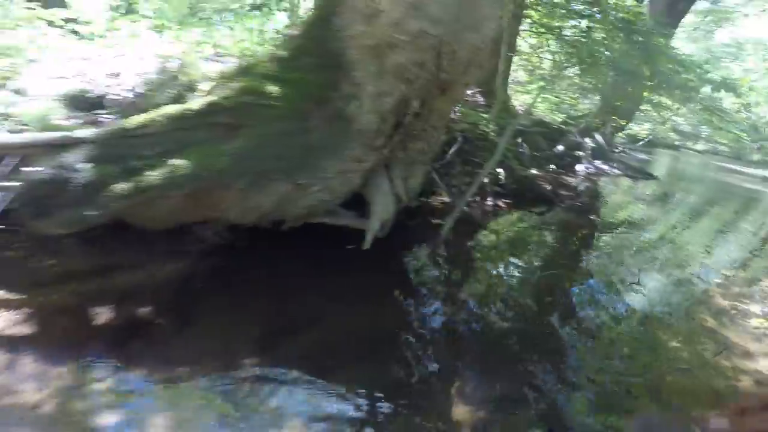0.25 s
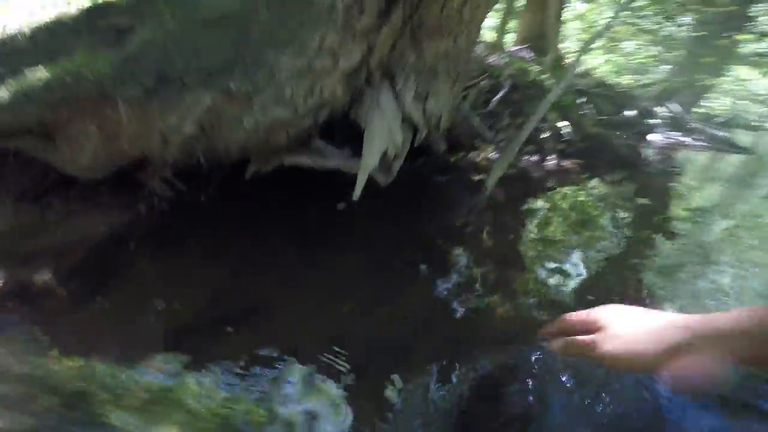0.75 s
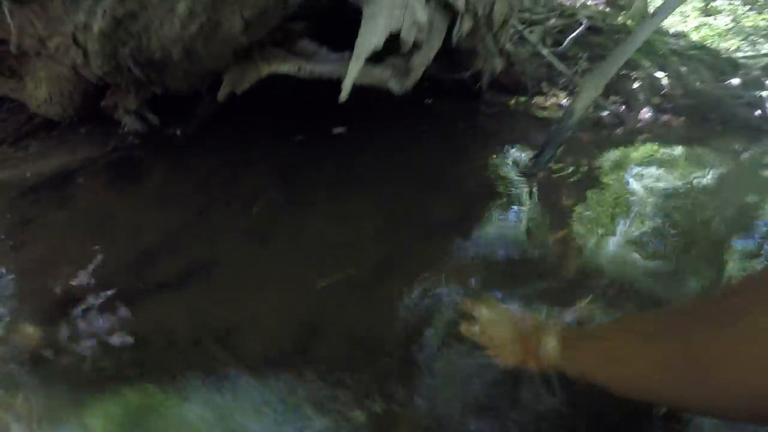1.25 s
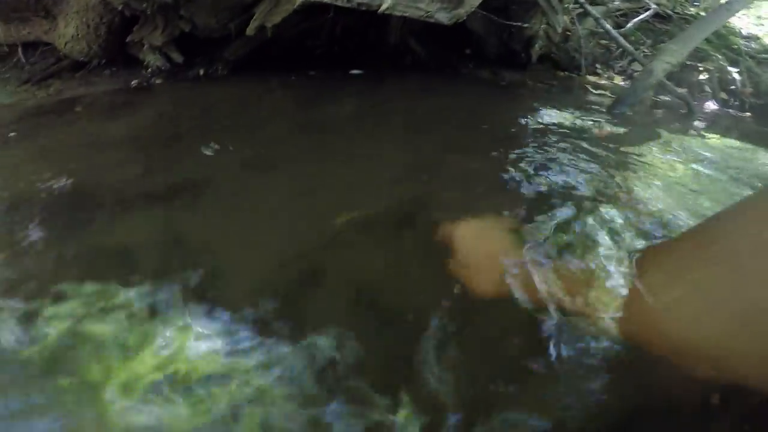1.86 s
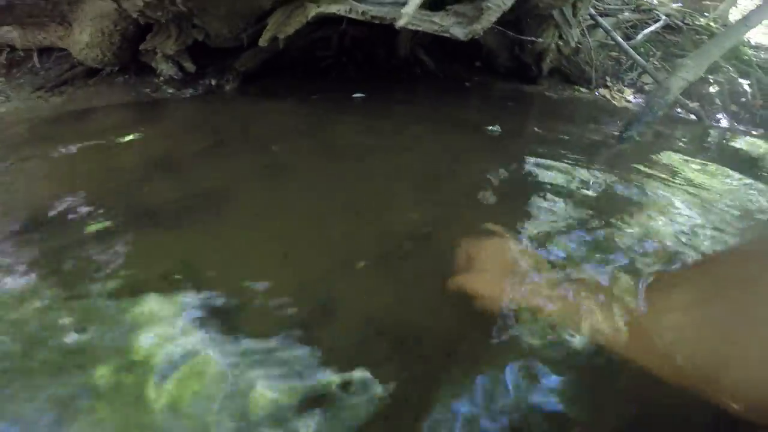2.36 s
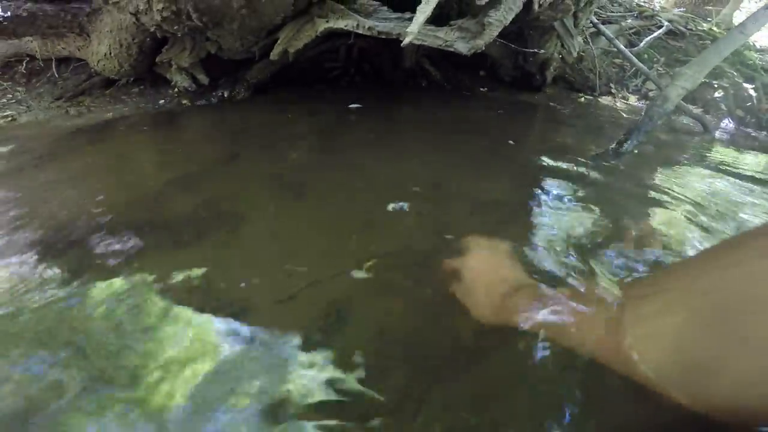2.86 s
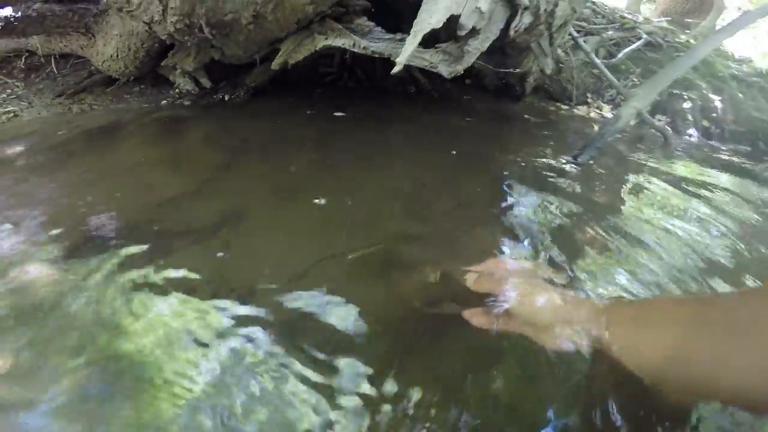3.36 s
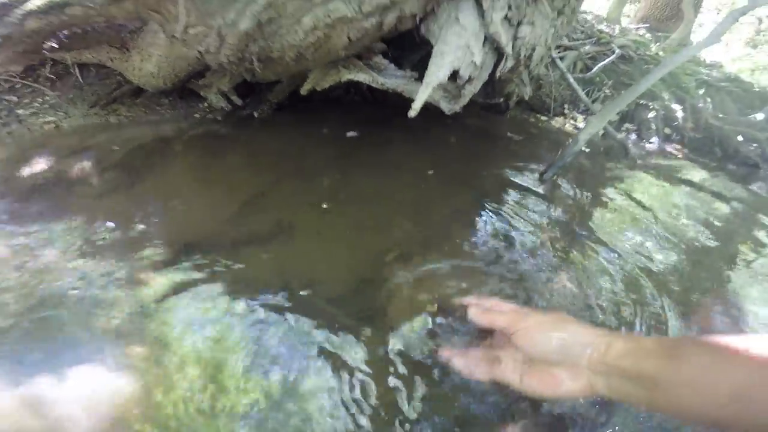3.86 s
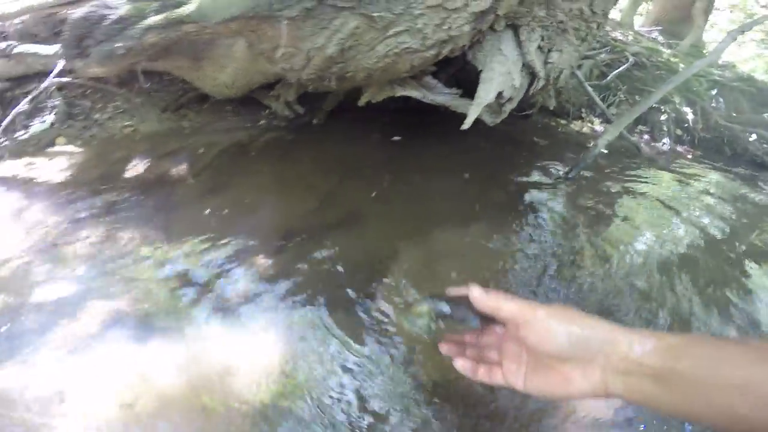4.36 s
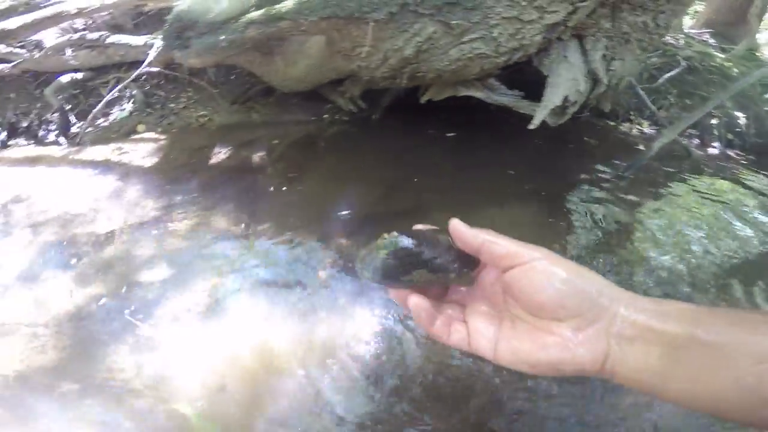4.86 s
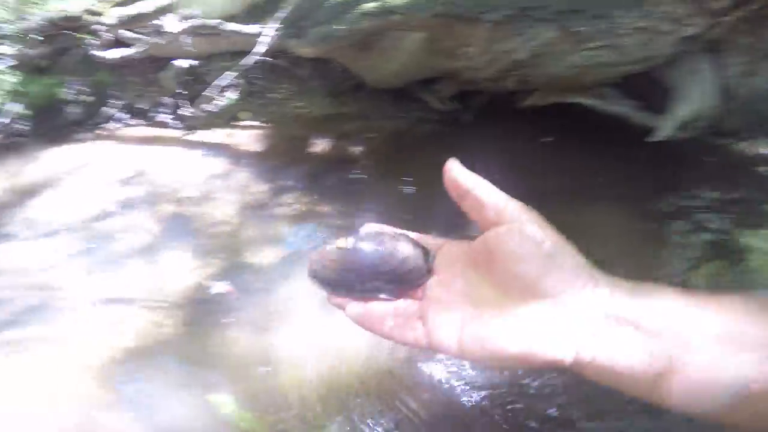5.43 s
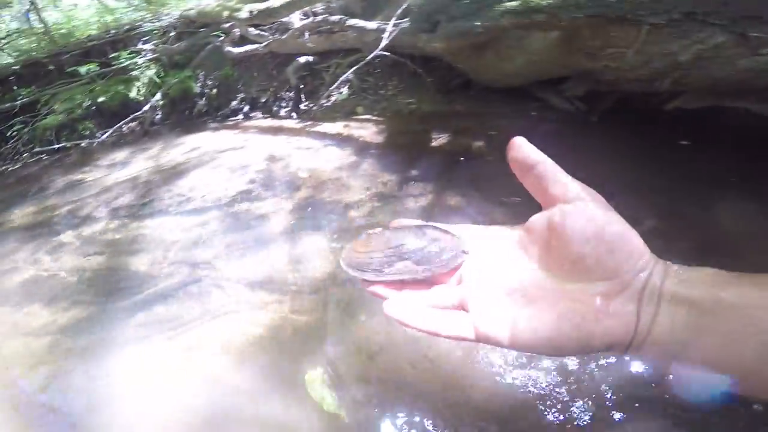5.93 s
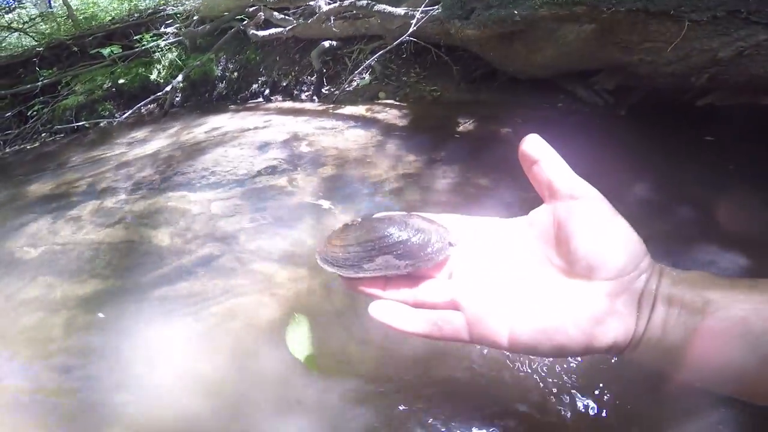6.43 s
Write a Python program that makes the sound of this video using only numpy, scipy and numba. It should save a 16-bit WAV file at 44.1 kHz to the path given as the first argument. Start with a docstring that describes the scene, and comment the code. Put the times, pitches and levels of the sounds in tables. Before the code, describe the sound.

Shallow water sloshes and gurgles with small, sharp splashes as someone wades and reaches into a forest stream. The splashing dies down within two seconds, and a distant bird faintly repeats a short phrase. Then single drops plink back into the water as the hand lifts out. The close, handheld microphone picks up a low rumble and dull knocks throughout, over a soft hiss.

```python
"""Water sloshes and glugs as someone wades and reaches into a shallow forest stream; then single
drops fall from the lifted hand. The water gets its notes from air bubbles, which ring like tiny bells.
The hand holding a small camera over the stream makes its housing rumble and knock. A far bird repeats
one phrase, and a second adds a few higher notes. Under it all lie a soft hiss and a thin whine
from the camera's electronics, tied to the frame rate."""
import sys
import numpy as np
from scipy import signal
from scipy.fft import rfft, irfft
from scipy.io import wavfile
from scipy.ndimage import uniform_filter1d
from numba import njit

SR = 44100
rng = np.random.default_rng(int(sys.argv[2]) if len(sys.argv) > 2 else 0)


def bounce(signal):
    """Save signal as a 16-bit WAV file at the path given by the first command-line argument."""
    frames = np.transpose(np.atleast_2d(signal))
    limited = np.clip(frames, -1, 1)
    pcm = np.round(limited * 32767).astype(np.int16)
    wavfile.write(sys.argv[1], SR, pcm)


N = 295029

# How loud the wading is. Each row: time in seconds, water level in dB, spray level in dB.
WADING = [(0, -59.5, -62.5), (.06, -57.5, -61.5), (.12, -58.5, -59), (.23, -55, -61.5), (.31, -60.5, -60.5),
          (.37, -51.5, -56), (.44, -57.5, -56), (.5, -57.5, -57.5), (.56, -57, -57), (.62, -51, -55),
          (.67, -61.5, -61), (.72, -59, -66), (.77, -60.5, -60.5), (.86, -59, -64.5), (1, -64, -67),
          (1.15, -68, -67), (1.3, -68.5, -69), (1.5, -71.5, -74), (1.9, -75, -71)]
WADING_END_S = WADING[-1][0]
# How hard the hand shakes the housing.
# Each row: time in seconds, rumble level in dB, upper bass in dB compared with the rumble.
GRIP_LEVELS = [(0.0, -45, -8), (0.16, -36.5, -8.5), (0.27, -44.5, -7), (0.33, -34.5, -7), (.4, -30, -14),
               (.47, -37, -10), (0.53, -44, -1.5), (.59, -35.5, -11.5), (.66, -38.5, -15),
               (0.73, -39.5, -4.5), (.81, -48.5, -3.5), (.89, -39, -10), (.99, -47.5, -6),
               (1.08, -41, -4.5), (1.15, -39.5, -12), (1.21, -32, -21), (1.29, -41, -13),
               (1.38, -48.5, -6.5), (1.48, -45.5, -6), (1.65, -47.5, -9.5), (1.78, -44, -10),
               (2, -46.5, -13), (2.24, -39.5, -20.5), (2.36, -43.5, -12), (2.44, -40.5, -15),
               (2.58, -47.5, -12), (2.65, -38.5, -18), (2.8, -53.5, -6.5), (2.96, -42.5, -13),
               (3.05, -47, -11), (3.16, -43.5, -19), (3.27, -48.5, -12), (3.33, -52, -0.5),
               (3.47, -41.5, -23), (3.6, -50.5, -21), (3.66, -44, -7.5), (3.97, -49, -12), (4.01, -56, -4),
               (4.19, -40.5, -7), (4.3, -57, 5.5), (4.5, -33.5, -15.5), (4.63, -45.5, -14),
               (5.5, -42, -8.5), (5.64, -49.5, 2.5), (5.73, -40.5, -23), (5.83, -43.5, -6.5),
               (5.91, -47, -11), (5.97, -46.5, -1.5), (6.04, -49, -8), (6.2, -48, -13.5),
               (6.45, -46.5, -7.5), (6.69, -50, -8)]
# Knocks in the housing. Each row: start in seconds, level in dB, sharp edge level in dB, pitch in Hz.
HOUSING_KNOCKS = [(0.051, -21, -49.5, 71), (.122, -20, -50, 66), (1.266, -30, -64, 72.5),
                  (1.765, -28, -52.5, 73), (2.16, -22, -54.5, 65), (2.284, -22.5, -52.5, 72),
                  (2.506, -35, -52.5, 80), (3.334, -16.5, -53, 69.9), (3.647, -32.5, -76, 72),
                  (4.013, -15.5, -50, 74.4), (4.15, -24, -55, 71.7), (4.224, -21.5, -51, 72),
                  (4.413, -21, -55.5, 70), (4.519, -23, -69.5, 72), (4.945, -22, -53, 72.6),
                  (4.981, -31, -52, 79.4), (5.05, -27.5, -49, 71.5), (5.21, -29, -49.5, 80),
                  (5.301, -27.5, -57, 72), (5.609, -30.5, -63.5, 72.6), (5.683, -28, -67, 72.5),
                  (5.794, -21, -48.5, 72), (5.904, -29.5, -52, 140), (5.826, -35, -66, 110),
                  (6.111, -28, -54, 79.6)]


def undb(db):
    """Turn a level in dB into a number to multiply by."""
    return 10 ** (np.asarray(db) / 20)


def level(x, db):
    """Scale a sound to an average (rms) level in dB."""
    return x * undb(db) / np.sqrt(np.mean(x ** 2))


def curves(table):
    """Join a table's timed rows with straight lines: one curve for each column after the time."""
    s, *columns = np.transpose(table)
    return [np.interp(np.arange(N) / SR, s, c) for c in columns]


def colour(x, points):
    """Make some pitches louder and others softer, following (Hz, dB) points."""
    hz, db = np.transpose(points)
    bin_hz = np.maximum(np.fft.rfftfreq(N, 1 / SR), 1)
    return irfft(rfft(x) * undb(np.interp(np.log(bin_hz), np.log(hz), db)), N)


def band(x, lo_hz, hi_hz):
    """Keep the part of a sound between two pitches."""
    return signal.sosfilt(signal.butter(2, [lo_hz, hi_hz], "band", fs=SR, output="sos"), x)


def wander(rate):
    """A smooth random curve, mostly within -1 to 1, that takes `rate` steps a second."""
    k = int(SR / rate)
    steps = np.repeat(rng.standard_normal(N // k + 1), k)
    return 0.83 * uniform_filter1d(uniform_filter1d(steps, k), k)[:N]


def steady_noise(points, seconds):
    """Coloured noise with its chance swells ironed out over `seconds`; average size near 1."""
    noise = colour(rng.standard_normal(N), points)
    k = int(seconds * SR)
    return noise / np.sqrt(uniform_filter1d(uniform_filter1d(noise ** 2, k), k))


@njit
def add_rings(out, start, hz, t60, size, glide, rise):
    """Tones that swell over `rise` cycles and fade 60 dB in `t60` seconds; `glide` above 0 bends up."""
    for g in range(len(start)):
        n, phase = int(t60[g] * SR), 0.
        for i in range(max(0, min(n, len(out) - start[g]))):
            phase += hz[g] * np.exp(glide * i / n) / SR
            envelope = np.exp(-6.9 * i / n) * min(phase / rise, 1.)
            out[start[g] + i] += size[g] * np.sin(2 * np.pi * phase) * envelope
    return out


def rings(s, hz, t60, size, glide, rise):
    """Place fading tones at start times `s`, in seconds."""
    start = np.clip(s * SR, 0, N - 1).astype(np.int64)
    each = np.ones(len(s))
    return add_rings(np.zeros(N), start, hz * each, np.clip(t60, .001, 1) * each, size, glide, rise)


def bubbles(count, lo_hz, hi_hz, cycles, spread_db):
    """A cloud of bubbles, of average size 1 during the wading; `spread_db` above 0 makes a few loud."""
    when, pitch, length, rank = rng.random((count, 4)).T
    hz = lo_hz * (hi_hz / lo_hz) ** pitch
    size = undb(-spread_db * np.log(rank + 1 / 400))
    cloud = rings(when * WADING_END_S, hz, cycles * (.5 + length) / hz, size, glide=0.353, rise=0.64)
    return level(cloud, 10 * np.log10(WADING_END_S * SR / N))


def slosh():
    """Churned water gurgles, crackles and fizzes, and sets the housing ringing."""
    # The tone of churned water. Each row: pitch in Hz, boost or cut in dB.
    water_colour = [(210, -34), (350, -5), (1050, -14), (1450, -3.5), (3540, -1.5), (3890, 1.5), (4750, -7),
                    (6370, 0), (7440, -3), (7910, -7.5), (14000, -13)]
    # Where the housing rings. Each row: pitch in Hz, width in Hz, strength in dB.
    resonances = [(1152, 250, -1), (1570, 93, -5), (1880, 100, -2.5), (3300, 170, 0), (3930, 130, 3),
                  (4400, 180, 7.5), (5200, 150, 6), (6850, 460, -6)]
    gurgle = bubbles(count=1500, lo_hz=585, hi_hz=6340, cycles=39.7, spread_db=2.5)
    crackle = bubbles(count=6000, lo_hz=1000, hi_hz=8500, cycles=9, spread_db=2.8)
    # each octave of the fizz flickers on its own
    fizz = sum(band(rng.standard_normal(N), hz, 2 * hz) * undb(3 * wander(60))
               for hz in 300 * 2 ** np.arange(6))
    water = colour(undb(-6.5) * gurgle + undb(-4) * crackle + undb(-6) * fizz, water_colour)
    housing = 0
    for hz, width, db in resonances:
        ringing = signal.lfilter(*signal.iirpeak(hz, hz / width, fs=SR), water)
        housing += undb(db + 4 * wander(40.21)) * ringing  # comes and goes as the water shifts
    water = level(water + housing, 0)
    body = signal.sosfilt(signal.butter(2, 3300, fs=SR, output="sos"), water)
    spray = water - body
    body_db, spray_db = curves(WADING)
    fade = np.clip((WADING_END_S - np.arange(N) / SR) / 0.347, 0, 1)
    return fade * (undb(body_db) * body + undb(spray_db) * spray)


def trickle():
    """Water runs off after the step: many bubbles of about one size blur into a wash."""
    # How loud the run-off is. Each row: time in seconds, level in dB.
    run_off = [(0, -70), (.5, -65), (.8, -64), (1.2, -64.5), (1.4, -70.5), (1.9, -97)]
    (db,) = curves(run_off)
    running = np.arange(N) / SR < run_off[-1][0]
    return running * undb(db) * bubbles(count=1600, lo_hz=2370, hi_hz=2964, cycles=44, spread_db=-1.5)


def grip():
    """Trembling muscles and slow shifts of the hand shake the housing into a rumble."""
    # The tone of the two layers. Each pair: pitch in Hz, boost or cut in dB.
    deep_colour = [(6, -7), (14, -8.5), (24, -0.5), (40, -10), (60, -24), (200, -71), (600, -110)]
    upper_colour = [(25, -25.5), (48, 4), (75, -7), (130, -25.5), (250, -33.5), (500, -43), (1500, -101)]
    deep = steady_noise(deep_colour, seconds=0.076)
    upper = steady_noise(upper_colour, seconds=0.015)
    deep_db, upper_db = curves(GRIP_LEVELS)
    return undb(deep_db) * deep + undb(deep_db + upper_db + 3.5 * wander(16)) * upper


def finger_slips():
    """Skin creeps on the housing: a low rustle that follows the grip and flares after each knock."""
    deep_db, upper_db = curves(GRIP_LEVELS)
    s, _, edge_db, _ = np.transpose(HOUSING_KNOCKS)
    rise_s, fade_s = 0.00315, 0.0364
    hits, t = np.zeros(N), np.arange(SR // 2) / SR
    hits[(s * SR).astype(int)] = undb(edge_db - 9)
    flare = signal.fftconvolve(hits, np.exp(-t / fade_s) * np.minimum(t / rise_s, 1))[:N]
    slips = rng.standard_normal(N) * undb(1.8 * wander(30))
    rustle = level(band(band(slips, 117, 186.3), 86, 264), 0)
    return (undb(deep_db + upper_db - 31) + flare) * rustle


def hiss():
    """The stream and the microphone make a smooth, almost steady hiss."""
    # The tone of the hiss. Each row: pitch in Hz, boost or cut in dB.
    hiss_colour = [(65, -41.5), (110, -9.5), (267, -19.5), (412, -22), (507, -22), (815, -25), (885, -25),
                   (1260, -26), (1710, -25), (5340, -29), (6300, -30.5), (6840, -33), (15300, -38.5)]
    return level(colour(rng.standard_normal(N), hiss_colour), -65) * undb(0.048 * wander(9.3))


def electronics():
    """The camera's whine restarts with every frame, and reading out each frame ticks twice."""
    frame_hz, cycles_per_frame = 29.97, 210.5
    frame_position = (np.arange(N) / SR * frame_hz - .21) % 1
    phase = 2 * np.pi * cycles_per_frame * frame_position
    whine = undb(-72) * np.sin(phase) + undb(-85.5) * np.sin(2 * phase)
    frames = np.arange(int(N / SR * frame_hz))
    ticks = 0
    for part_of_frame, db in ((.33, -69), (.74, -80)):
        late, higher, louder = rng.standard_normal((len(frames), 3)).T
        s = (frames + part_of_frame + 0.024 * late) / frame_hz
        ticks += rings(s, hz=8545 + 70 * higher, t60=0.022, size=undb(db + 1.8 * louder), glide=0., rise=12.)
    return whine + ticks


def glugs_and_blips():
    """Short rising tones: low glugs in the water, two faint blips near housing knocks, one high chirp."""
    # Each row: start in seconds, pitch in Hz, level in dB, ring time in seconds.
    rising_blips = [(.02, 850, -55.5, 0.072), (.135, 700, -56, 0.047), (.155, 585, -50.5, 0.05),
                    (.19, 246, -52.5, 0.079), (.199, 695, -45, 0.031), (.255, 644, -57, 0.064),
                    (.315, 502, -56.5, 0.127), (.425, 940, -49, 0.0525), (.455, 281, -55.5, 0.11),
                    (.49, 324, -52, 0.055), (.57, 579, -54, 0.085), (.59, 695, -57.5, 0.14),
                    (.63, 790, -58, 0.033), (1.275, 740, -53.5, .02), (3.991, 2000, -53.5, .012),
                    (2.159, 530, -60, 0.052), (2.322, 783, -61, 0.032)]
    s, hz, db, t60 = np.transpose(rising_blips)
    return rings(s, hz, t60, undb(db), glide=0.576, rise=0.95)


def knocks():
    """A sudden shift of the hand knocks the housing: a sharp edge, then slower and slower swings."""
    s, db, edge_db, hz = np.transpose(HOUSING_KNOCKS)
    edge = rings(s, hz=193, t60=0.0482, size=-undb(edge_db), glide=0.24, rise=0.77)
    thud = rings(s, hz, t60=5.275 / hz, size=-undb(db), glide=-2.47, rise=1.)
    return edge + thud


def thrown_droplets(count=16):
    """Random extra drops for drops(), thrown by the wading and louder when it is louder."""
    when, pitch, spatter_pitch = rng.random((count, 3)).T
    s, hz, spatter_hz = 1.3 * when, 1300 * 3.4 ** pitch, 1300 * 8.1 ** spatter_pitch
    wading_s, wading_db, _ = np.transpose(WADING)
    scatter_db = 1.5 * rng.standard_normal((count, 2)).T
    bubble_db, impact_db = np.interp(s, wading_s, wading_db) + scatter_db
    return np.array([s, hz, bubble_db + 9, 20 / hz, spatter_hz, impact_db + 8, impact_db - 14])


def drops():
    """Each drop hits the surface with a crack, spatters briefly and leaves a bubble that rings."""
    # Each row: time in seconds, bubble pitch in Hz, bubble level in dB, ring time in seconds,
    # spatter pitch in Hz, spatter level in dB, crack level in dB.
    falling_drops = [(0.0901, 3930, -47, 0.037, 5340, -35.5, -70),
                     (0.1147, 1773, -34, 0.0148, 1300, -46, -53), (0.177, 5200, -43, .01, 3900, -47, -70),
                     (.13, 3860, -53, .012, 1500, -46, -70), (0.202, 1400, -23, 0.006, 3900, -35, -70),
                     (.203, 2270, -34, 0.0071, 2700, -45, -70), (0.2226, 1830, -42, 0.0173, 3000, -50, -70),
                     (.275, 3170, -45.5, 0.015, 2000, -50.5, -70),
                     (.324, 6800, -44.5, .005, 5800, -48, -57), (0.33, 2600, -45, .01, 4000, -51, -70),
                     (0.358, 3830, -35.5, 0.0133, 1790, -52, -70),
                     (0.37, 1320, -41.5, 0.022, 4400, -46, -68),
                     (0.4273, 4080, -35, 0.0067, 1980, -43, -70),
                     (0.436, 5740, -33.5, 0.0046, 3300, -47, -70),
                     (0.443, 4280, -36.5, 0.0105, 6500, -31, -50), (.482, 2600, -39, .007, 4200, -38, -70),
                     (.493, 3700, -39, 0.007, 4300, -44, -70), (0.508, 6300, -45, .008, 5200, -46, -70),
                     (0.5478, 1150, -40.5, 0.019, 3800, -52, -70),
                     (0.557, 7100, -49, .006, 5000, -51.5, -63), (.5685, 4350, -37, .0068, 1900, -58, -70),
                     (0.5928, 6560, -33.5, 0.004, 1180, -43, -70), (.605, 6280, -37, .005, 7140, -48, -67),
                     (0.612, 2300, -39, 0.012, 3800, -38, -60), (.617, 3756, -31.5, 0.006, 2000, -43, -70),
                     (0.64, 2370, -38.5, 0.013, 1820, -56, -70),
                     (0.681, 6740, -34, .0038, 4650, -34.5, -49), (0.767, 4820, -47, .008, 1880, -45, -73),
                     (.815, 2730, -47.5, .016, 5500, -46, -70), (0.8725, 2800, -27, 0.0071, 3950, -34, -73),
                     (.873, 1750, -39, 0.0078, 1310, -48.5, -73), (.895, 4220, -50, 0.0091, 3800, -54, -73),
                     (0.9384, 1600, -45, 0.017, 2500, -54, -70), (.956, 2630, -44, .007, 7000, -40, -70),
                     (0.9675, 6780, -43, .006, 4930, -40, -53), (1.015, 7000, -48, .005, 2800, -50, -70),
                     (1.029, 2750, -44, .007, 3800, -42, -55), (1.067, 6900, -51, .005, 6300, -52, -70),
                     (1.101, 6370, -44.5, 0.0127, 3900, -49.5, -57),
                     (1.1327, 2220, -34.5, 0.012, 3700, -38, -53),
                     (1.151, 4000, -49.5, 0.0217, 4300, -52, -73), (1.157, 2860, -44, .016, 4000, -50, -73),
                     (1.1783, 2570, -46, 0.0076, 1710, -45, -73),
                     (1.227, 2600, -45.5, 0.0107, 2000, -50, -73),
                     (1.2767, 2530, -29.5, 0.0037, 5430, -43.5, -60),
                     (1.291, 4300, -55, .02, 6900, -47, -70), (1.3132, 2815, -48, .015, 4460, -42.5, -70),
                     (1.331, 7000, -52.5, .008, 4000, -55, -70),
                     (1.349, 5300, -45.5, .0075, 3840, -53, -57),
                     (1.461, 1590, -46.5, 0.014, 4300, -60.5, -74),
                     (1.486, 7000, -53, .005, 7400, -54, -70), (1.511, 2000, -48, 0.025, 3800, -58, -73),
                     (1.53, 1400, -55, 0.033, 1700, -56, -74), (1.5531, 2720, -49, .0071, 4100, -53, -54),
                     (2.379, 1480, -46, 0.019, 3100, -51, -74),
                     (2.613, 2130, -37.5, 0.0045, 13900, -44, -49),
                     (2.6138, 5200, -47, .008, 9500, -46, -60), (2.942, 2580, -54, 0.034, 3000, -52, -65),
                     (3.018, 1400, -55, 0.03, 890, -64.5, -79), (3.1038, 2270, -51, .0071, 3050, -51, -74),
                     (3.138, 2880, -53, .015, 1570, -48, -78), (3.7802, 5530, -49, .007, 12700, -60, -75),
                     (3.8277, 5920, -50, .006, 8900, -56, -62),
                     (3.9078, 5200, -39, 0.00644, 7300, -39, -58),
                     (3.911, 6780, -44, 0.0052, 4300, -51.5, -49),
                     (3.942, 3380, -45.5, 0.022, 5200, -40.5, -53.5),
                     (3.9564, 3074, -47, 0.0117, 4430, -47, -77), (3.971, 1534, -56, 0.08, 4900, -57, -75),
                     (3.996, 5250, -51, .014, 2330, -52, -59), (4, 1425, -48.5, 0.067, 5280, -36.5, -58),
                     (4.017, 8950, -49, .006, 1390, -60.5, -55), (4.357, 1593, -57, 0.086, 1790, -54, -75),
                     (4.439, 2400, -54, 0.02, 1790, -52, -75), (4.45, 1550, -61, .06, 2900, -58, -78),
                     (4.49, 1550, -60, 0.028, 1800, -62, -78), (4.6023, 4320, -43, 0.011, 5200, -50, -61),
                     (4.608, 3300, -53, .016, 3600, -58, -75), (4.8407, 1138, -47.5, 0.083, 1580, -52, -63),
                     (4.8737, 4730, -50, .006, 1100, -65, -74), (4.962, 2930, -52, 0.023, 4500, -56, -74),
                     (5.1705, 5370, -43.5, 0.0076, 6880, -42, -56.5),
                     (5.2301, 8550, -50, .006, 11900, -53, -55),
                     (5.3755, 2790, -42, 0.0132, 4730, -55.5, -77),
                     (5.4767, 2800, -47.5, .015, 2090, -56, -73.5),
                     (5.488, 1540, -52, 0.01, 2200, -52, -75), (5.9, 1780, -56, 0.0068, 2700, -58, -75)]
    all_drops = np.hstack([np.transpose(falling_drops), thrown_droplets()])
    s, hz, db, t60, spatter_hz, spatter_db, crack_db = all_drops
    bubble = rings(s - 2 / hz, hz, t60 + 1.5 / hz, undb(db), glide=0.011, rise=3.)
    spatter = rings(s - 1 / spatter_hz, spatter_hz, 14 / spatter_hz, undb(spatter_db),
                    glide=0.056, rise=1.5)
    hits, t = np.zeros(N), np.arange(2000) / SR
    hits[(s * SR).astype(int)] = undb(crack_db)
    burst = signal.fftconvolve(hits, np.exp(-t / 0.00096) * np.minimum(t / 0.00012, 1))[:N]
    crack = band(burst * np.sign(rng.standard_normal(N)), 8200, 17000)
    direct = bubble + spatter + crack
    bank_echo = rng.standard_normal(len(t)) * np.exp(-t / 0.0056) * undb(-30)
    return direct + signal.fftconvolve(direct, bank_echo)[:N]


def slaps():
    """Snaps off the water or in the housing, with no bubble note: a push, a scrap of noise, an echo."""
    # Each row: start in seconds, low and high edge in Hz, peak level in dB, noise fade in seconds.
    snaps = [(0.2013, 805, 4300, -30, 0.0013), (0.443, 3800, 7600, -37, 0.0023),
             (0.6788, 4230, 9850, -40, 0.00173), (0.872, 1490, 4400, -31.5, 0.0014),
             (.956, 5500, 7800, -48, .001), (1.1318, 1900, 4230, -38.5, 0.0011),
             (1.2201, 1330, 3440, -44, 0.0013), (1.2756, 1800, 7500, -45, .001),
             (1.348, 3800, 7300, -50, .001), (2.6133, 1300, 19900, -37, 0.00057),
             (3.14, 2360, 3330, -55.5, 0.0104), (3.245, 2300, 3200, -57, .003),
             (3.944, 3000, 12000, -50.5, .0012), (4.013, 250, 2500, -46.5, 0.0021),
             (5.902, 200, 2500, -54, 0.0077), (6.112, 600, 1800, -60, 0.0036)]
    echo_s = .0032
    out, t = np.zeros(N), np.arange(900) / SR
    for s, lo_hz, hi_hz, db, fade_s in snaps:
        push = t == 0
        noise = undb(-13) * np.sign(rng.standard_normal(len(t))) * np.exp(-t / fade_s)
        snap = band(band(push + noise, lo_hz, hi_hz), lo_hz, hi_hz)
        snap += undb(-13) * np.interp(t - echo_s, t, snap, left=0)
        start = int(s * SR)
        out[start:start + len(t)] += undb(db) * snap / np.abs(snap).max()
    return out


def birds():
    """Two far birds whistle wavering notes, smeared by echoes from the trees."""
    # The first bird's notes. Each row: start within the phrase and length in seconds,
    # first and last pitch in Hz, level in dB compared with the phrase.
    phrase = [(0, 0.045, 2560, 2686, -1.5), (0.065, 0.063, 2710, 2780, -2.5),
              (0.076, 0.045, 2610, 2650, -6), (0.17, 0.06, 2700, 2760, -6),
              (0.219, 0.029, 2370, 2335, -4.5)]
    # Its repeats of the phrase. Each row: start in seconds, level in dB, fade in dB per second.
    repeats = [(2.066, -68, 25), (2.454, -65.5, 10), (2.848, -68, 27), (3.265, -68, 36), (3.68, -77, 15)]
    # The higher bird. Each row: start and length in seconds, first and last pitch in Hz, level in dB.
    high_notes = [(2.418, 0.0323, 3300, 3460, -74), (2.69, 0.03, 2913, 3200, -70),
                  (2.755, 0.063, 3067, 3210, -80.5), (2.752, 0.095, 4050, 3850, -81),
                  (3.102, .04, 3000, 3180, -73)]
    flutter, waver_hz = undb(2.1 * wander(60)), 35 * wander(90)
    notes = [(phrase_s + s, length, from_hz, to_hz, phrase_db + db - fade * s)
             for phrase_s, phrase_db, fade in repeats
             for s, length, from_hz, to_hz, db in phrase]
    direct = np.zeros(N)
    for s, length, from_hz, to_hz, db in notes + high_notes:
        n, i = int(length * SR), int(s * SR)
        hz = np.linspace(from_hz, to_hz, n) + waver_hz[i:i + n]
        tone = np.sin(2 * np.pi * np.cumsum(hz) / SR)
        direct[i:i + n] += undb(db) * np.hanning(n) ** 0.084 * tone * flutter[i:i + n]
    t = np.arange(SR // 2) / SR
    tree_echo = rng.standard_normal(len(t)) * np.exp(-t / .1) * undb(-31)
    return direct + signal.fftconvolve(direct, tree_echo)[:N]


def scene():
    """Add up all the sounds at the one microphone."""
    water = slosh() + trickle() + glugs_and_blips() + slaps() + drops()
    handling = grip() + finger_slips() + knocks()
    return (water + handling + birds() + electronics() + hiss())[None]


def record(dry):
    """The camera cuts off the highest treble, above 15300 Hz."""
    return signal.sosfilt(signal.ellip(8, .2, 60, 15300, fs=SR, output="sos"), dry)


dry = scene()
out = record(dry)
bounce(out)
```